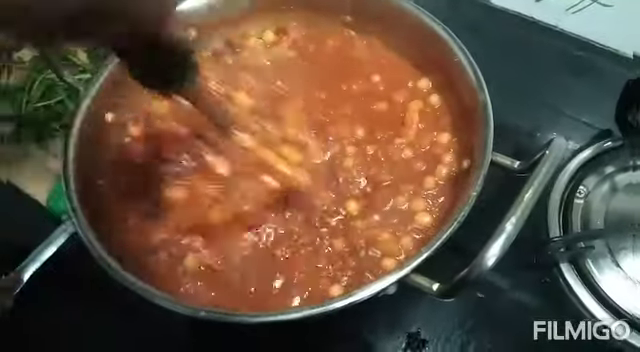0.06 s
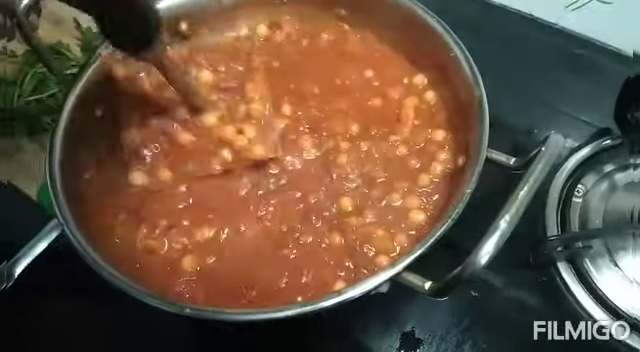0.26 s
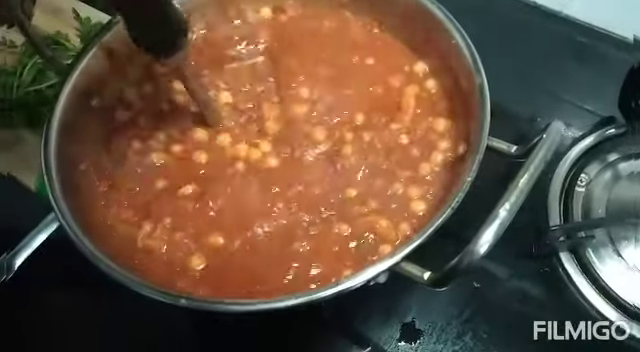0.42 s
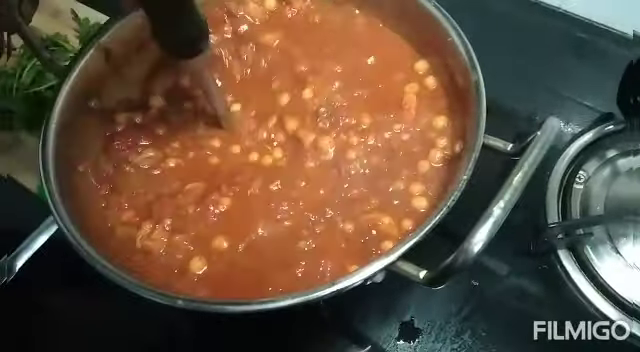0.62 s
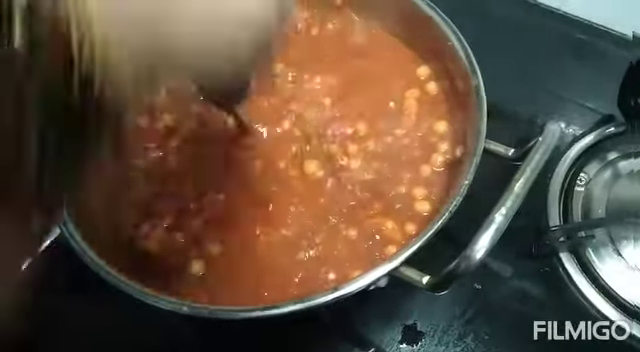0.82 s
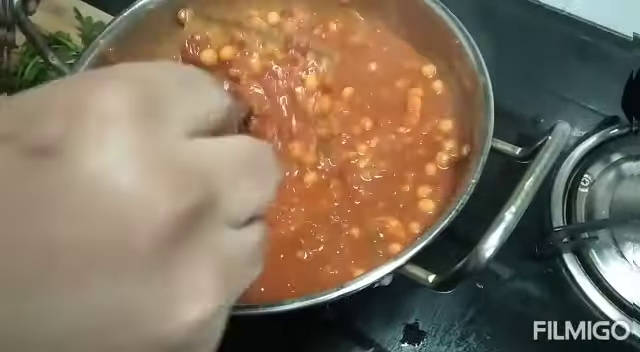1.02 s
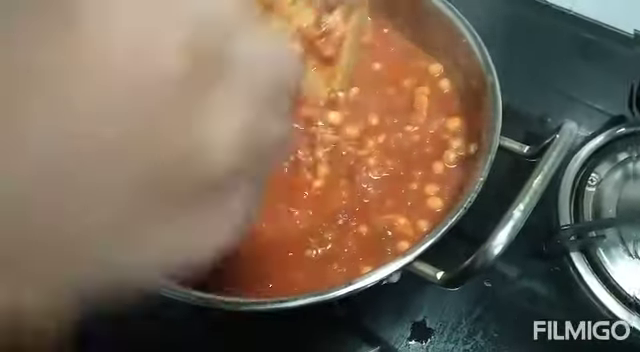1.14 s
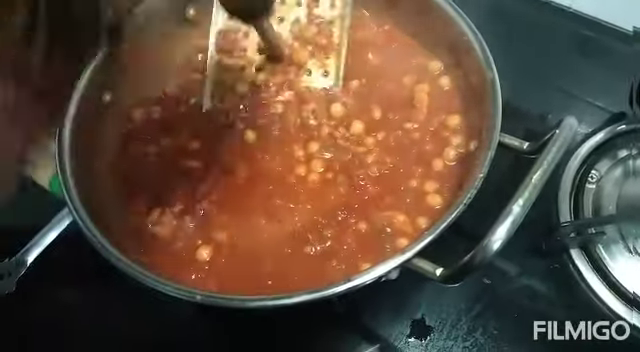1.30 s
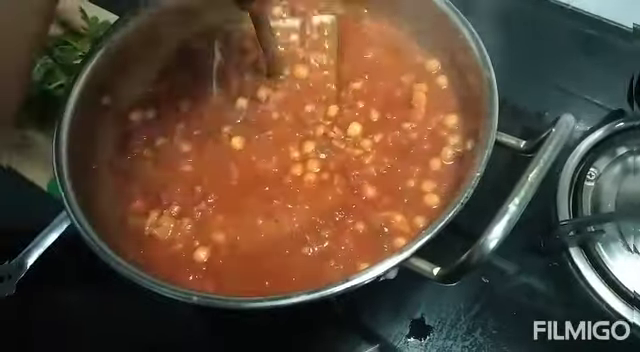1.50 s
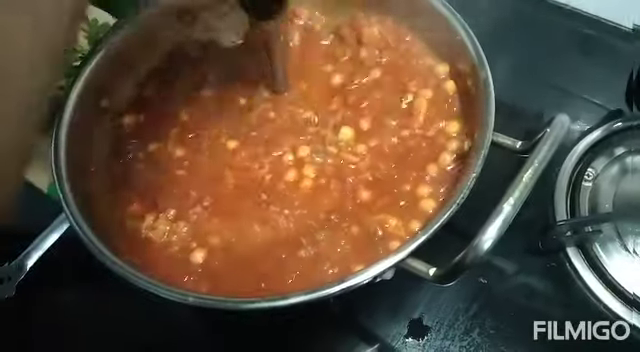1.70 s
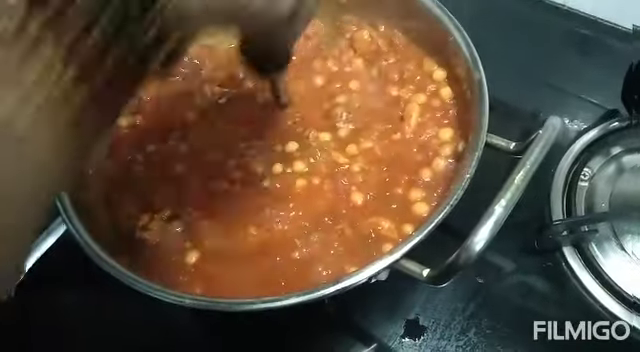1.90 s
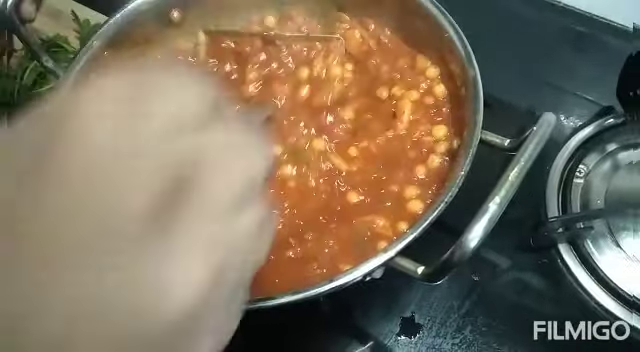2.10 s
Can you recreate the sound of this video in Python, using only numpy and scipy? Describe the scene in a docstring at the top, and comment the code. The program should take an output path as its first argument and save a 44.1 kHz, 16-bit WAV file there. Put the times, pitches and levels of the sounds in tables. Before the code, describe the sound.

A steel masher lands hard on the bottom of a steel pan of thick curry, settles with dull bumps and lifts with a soft knock, then repeats; close microphone, echoing bare kitchen, low simmer and faint hum.

```python
"""A steel masher is pushed through thick curry and knocks on the bottom of a steel pan in a bare, echoing kitchen.
Each stroke lands hard, settles with dull bumps and lifts with a soft knock: short noise bursts
over decaying sines for pan and masher. Small ticks, pops and hisses are narrow noise and tiny rings.
A faint whine, a low hum and the simmer form the floor; the echo is decaying noise, convolved with the sounds."""
import sys
import numpy as np
from scipy import signal
from scipy.io import wavfile

SR = 44100
rng = np.random.default_rng(int(sys.argv[2]) if len(sys.argv) > 2 else 0)


def gain_from_decibels(decibels):
    """Convert decibel values to linear amplitude factors."""
    exponent = np.asarray(decibels, float) / 20
    return 10 ** exponent


def digitize_waveform(pressure):
    """Quantize a signal to 16-bit integers and store it at the path in sys.argv[1].

    Rows of a 2-D input are taken as channels; values are limited to [-1, 1].
    """
    field = np.atleast_2d(pressure).T
    bounded = np.clip(field, -1, 1)
    quanta = np.round(bounded * 32767).astype(np.int16)
    wavfile.write(sys.argv[1], SR, quanta)


N = 94815
EDGES = 28 * 2 ** np.arange(0, 9.2, 1 / 3)    # third-octave band edges, Hz


def rms_one(x):
    """Scale to rms 1."""
    return x / np.sqrt(np.mean(x ** 2) + 1e-20)


def at_hz(points, hz):
    """Read a table of (Hz, value) on a log-frequency axis."""
    table_hz, values = np.transpose(points)
    return np.interp(np.log(hz), np.log(table_hz), values)


def drift(rate_hz):
    """Slow random wander of spread 1: low-passed noise, made at SR / 40 and interpolated."""
    r = np.exp(-2 * np.pi * rate_hz * 40 / SR)
    white = rng.standard_normal(N // 40 + 2002)
    slow = rms_one(signal.lfilter([1], [1, -2 * r, r * r], white)[2000:])    # skip the filter's start
    return np.interp(np.arange(N) / 40, np.arange(len(slow)), slow)


def band(x, low_hz, high_hz):
    """Butterworth band-pass."""
    sos = signal.butter(2, [low_hz, min(high_hz, 0.45 * SR)], "band", fs=SR, output="sos")
    return signal.sosfilt(sos, x)


def colour(x, spectrum):
    """Causal colouring by a bank of third-octave bands."""
    return sum(gain_from_decibels(at_hz(spectrum, np.sqrt(low * high))) * band(x, low, high)
               for low, high in zip(EDGES, EDGES[1:]))


def ring(clicks, hz, t60):
    """Resonant mode: a unit click sets a sine of height 1 ringing, down 60 dB after t60 seconds."""
    r = gain_from_decibels(-60 / (t60 * SR))
    w = 2 * np.pi * hz / SR
    return signal.lfilter([0, np.sin(w)], [1, -2 * r * np.cos(w), r * r], clicks + 1e-18)


def burst(length_s):
    """Short grinding contact: noise that rises and dies within a few lengths, with its outline's energy."""
    t = np.arange(4000) / (max(length_s, 0.0005) * SR / 2)
    outline = t * np.exp(1 - t)
    return rms_one(rng.standard_normal(4000) * outline) * np.sqrt(np.mean(outline ** 2))


def add(out, s, sound):
    """Mix a sound in at s seconds."""
    i = int(s * SR)
    out[i:i + len(sound)] += sound[:N - i]


def floor():
    """Simmer and room noise in patchy bands, hum as narrow noise, whine as a wavering sine."""
    # Noise spectrum. Each row: frequency in Hz, relative density in dB per Hz
    floor_spectrum = [(25, -44), (60, -17), (119, -10), (337, -0.5), (550, -8.5), (850, -1), (1300, -9),
                      (1690, -22), (2030, -8.5), (2600, -9.5), (4200, -12.5), (5800, -18), (8500, -14.5),
                      (11000, -17), (14000, -26)]
    # Simmer and stirring over time. Each row: time in seconds, level in dB
    stir_levels = [(0, -56.5), (.19, -58.5), (.9, -56), (1.1, -61), (1.35, -59), (1.7, -53.5), (1.95, -60),
                   (2.15, -54.5)]
    # Low hums. Each row: centre in Hz, width in Hz, level in dB
    hum_bands = [(99, 34, -73), (126.8, 4.5, -68)]
    t = np.arange(N) / SR
    white = rng.standard_normal((2, N))
    noise = np.zeros(N)
    for k, (low, high) in enumerate(zip(EDGES, EDGES[1:])):
        patchy_db = at_hz(floor_spectrum, np.sqrt(low * high)) + 0.5 * drift(14.0)
        noise += gain_from_decibels(patchy_db) * band(white[k % 2], low, high)    # neighbours use separate noise
    out = gain_from_decibels(np.interp(t, *np.transpose(stir_levels))) * rms_one(noise)

    for hz, width_hz, db in hum_bands:
        hum = band(rng.standard_normal(N), hz - width_hz / 2, hz + width_hz / 2)
        out += gain_from_decibels(db) * rms_one(hum)

    whine_hz = 718 + 1.49 * drift(3.22)
    whine_db = -65 + 0.27 * drift(1.7)
    phase = 2 * np.pi * np.cumsum(whine_hz) / SR
    return out + np.sqrt(2) * gain_from_decibels(whine_db) * np.sin(phase)


def kitchen(x):
    """Echo of bare walls: noise that builds up and dies band by band, with a stronger early part."""
    # Decay time of the room. Each row: frequency in Hz, t60 in seconds
    room_decay = [(100, 0.9), (300, 0.82), (800, 1.145), (2000, 0.95), (5000, 0.74), (9000, 0.81),
                  (12000, 0.75), (14000, 0.5)]
    build_s, early_db, early_t60_s = 0.007, 11, 0.1
    t = np.arange(N // 2) / SR
    white = rng.standard_normal((2, N // 2))
    echo = np.zeros(N // 2)
    for k, (low, high) in enumerate(zip(EDGES, EDGES[1:])):
        t60 = at_hz(room_decay, np.sqrt(low * high))
        echo += band(white[k % 2], low, high) * gain_from_decibels(-60 * t / t60)
    echo *= 1 - np.exp(-t / build_s)
    echo *= 1 + gain_from_decibels(early_db - 60 * t / early_t60_s)
    echo *= gain_from_decibels(1 * drift(41.0)[:N // 2] * np.exp(-t / 0.58))    # lumps of 1 dB that even out
    return signal.fftconvolve(x, echo / np.sqrt(np.sum(echo ** 2)))[:N]


def bubbles():
    """Small pops in the sauce: decaying sines at random times, sizes and pitches."""
    per_s, level_db, cycles = 50, -67, 6.0    # cycles: t60 in periods
    size_db = 2.9 * np.minimum(rng.exponential(1, N), 4)
    sizes = gain_from_decibels(size_db) * (rng.random(N) < per_s / SR)
    dealt = rng.integers(0, 12, N)    # which of twelve pitches each pop gets
    pops = sum(ring(sizes * (dealt == k), hz, cycles / hz)
               for k, hz in enumerate(np.geomspace(700, 7000, num=12)))
    return gain_from_decibels(level_db) * pops


def hisses():
    """Sauce squeezed and dragged: grainy bands of noise that swell and fade."""
    # Each row: start in seconds, length in seconds, level in dB, centre in Hz, half-width as share of centre
    hiss_events = [(0.22, 0.47, -51, 8500, 0.33), (1.04, 0.43, -66.5, 1670, 0.061),
                   (1.384, .2, -46, 9300, .3), (2.026, 0.23, -62.5, 4100, 0.14)]
    out, t = np.zeros(N), np.arange(N) / SR
    for s, length_s, db, hz, share in hiss_events:
        noise = rms_one(band(rng.standard_normal(N), hz / (1 + share), hz * (1 + share)))
        grainy = noise * gain_from_decibels(1.3 * drift(40.0))
        progress = np.clip((t - s) / length_s, 0, 1)
        out += gain_from_decibels(db) * grainy * np.sin(np.pi * progress ** 0.73)
    return out


def ticks():
    """Small ticks, a dry bump and the bright clicks of soft knocks: short bursts of band-passed noise."""
    # Each row: start in seconds, level in dB, centre in Hz, length in seconds
    tick_events = [(0.093, -56, 8200, 0.0033), (0.102, -53.5, 3600, .009), (0.539, -50.5, 4270, 0.019),
                   (0.983, -59.5, 5060, 0.021), (0.299, -28, 2000, 0.0047), (.537, -40, 840, 0.0059),
                   (.538, -45.5, 320, 0.01), (1.317, -50.5, 1570, 0.0048), (1.604, -46, 1360, 0.0035),
                   (1.797, -58, 4040, 0.0023), (0.346, -33, 9200, 0.0062), (0.6594, -45.5, 3980, 0.0066),
                   (.66, -41, 8550, 0.0036), (0.718, -48.5, 3840, 0.0038), (0.769, -51, 4060, 0.0048),
                   (0.938, -41, 10900, .002), (0.993, -46, 10500, 0.021), (1.344, -56.5, 9200, 0.0057),
                   (1.72, -51.5, 4500, 0.0054), (1.754, -54, 3300, 0.004), (1.8194, -46, 4200, .003),
                   (1.82, -49, 8100, .004), (2.014, -47.5, 9350, 0.0013), (2.073, -54, 3870, 0.0026),
                   (2.117, -44, 11000, 0.0054)]
    spread = 0.26    # band half-width as share of centre
    out = np.zeros(N)
    for s, db, hz, length_s in tick_events:
        sound = band(burst(length_s), hz / (1 + spread), hz * (1 + spread))
        add(out, s, gain_from_decibels(db) * sound / np.sqrt(4 * spread * hz / SR))    # make up for the narrow band
    return out


def strike(clicks, s, db, modes):
    """Put a click at s into every mode's train, with 1 dB of random scatter."""
    mode_db = np.array(modes)[:, 0]
    scatter_db = 1 * rng.standard_normal(len(modes))
    out = clicks.copy()
    out[:, int(s * SR)] = gain_from_decibels(db + mode_db + scatter_db)
    return out


def knocks():
    """Each contact cracks, sends a clean pulse to the walls and strikes the pan; hard ones also ring the masher."""
    # Masher lands on the pan. Each row: start in seconds, crack level in dB before colouring,
    # contact length in seconds, brightest frequency in Hz, pan ring in dB, masher ring in dB
    blow_events = [(0.2002, -12.5, 0.00606, 3780, -36, -31.5), (1.3772, -15, 0.00254, 3030, -37, -42.5)]
    # Cushioned bumps, and at .692 a faint swell of the beating pan ring. Each row: start in seconds,
    # thud level in dB before colouring, contact cut-off in Hz, contact length in seconds,
    # pan ring in dB before the cut-off
    bump_events = [(.234, -25.5, 1050, 0.0029, -35.5), (0.6587, -32, 1080, 0.0041, -36.5),
                   (.692, -38.5, 990, .004, -52), (1.41, -28.5, 980, 0.003, -36.5),
                   (1.8195, -34.5, 1025, 0.0064, -38)]
    # Colour of the contacts. Each row: frequency in Hz, level in dB per Hz
    crack_spectrum = [(60, -23), (110, -1.5), (200, -1.5), (425, 5), (540, 3.5), (800, 9), (1400, 8),
                      (1750, 6.5), (2230, 10), (3200, 5.5), (4180, 6), (5500, 2.5), (6800, 1.5),
                      (8880, 5.5), (10500, 2.5), (12000, 7), (13500, -7), (15000, -22)]
    # Pitches of the pan's modes in Hz
    pan_pitches = [283, 430, 630, 774, 825, 872, 965, 993, 1092, 1275, 1465, 1950, 2697, 3117]
    # Pan modes, in the same order. Each row: level in dB relative to the strike, t60 in seconds
    pan_modes = [(-13.5, 0.3), (-1.5, 0.078), (-18.5, 0.13), (-6, 0.1), (-3, 0.2), (-4, 0.56),
                 (-11.5, 0.43), (-9.5, 0.25), (-14, 1), (-4.5, 0.05), (-2, 0.36), (0.5, 0.05), (-11, 0.27),
                 (-5, 0.17)]
    # Pitches of the masher's modes in Hz
    masher_pitches = [2125, 2163, 2197, 2226, 2240, 2292, 4000, 4075]
    # Masher modes, in the same order. Each row: level in dB relative to the strike, t60 in seconds
    masher_modes = [(-8, .3), (-5, .45), (0, .85), (-4, .55), (-6, .4), (-8, .3), (-4, .1), (-5, .09)]
    peak_db, peak_width = -0.5, 0.31    # resonance of a hard blow; width as share of its frequency

    crack, pulse = np.zeros(N), np.zeros(N)
    click = signal.unit_impulse(4000)
    pan, masher = np.zeros((len(pan_modes), N)), np.zeros((len(masher_modes), N))

    for s, db, length_s, hz, pan_db, masher_db in blow_events:
        b, a = signal.iirpeak(hz, 1 / peak_width, fs=SR)
        for out, sound in ((crack, burst(length_s)), (pulse, np.sqrt(length_s * SR) * click)):
            peak = gain_from_decibels(peak_db) * signal.lfilter(b, a, sound)
            add(out, s, gain_from_decibels(db) * (sound + peak))
        middle_s = s + length_s / 2
        pan = strike(pan, middle_s, pan_db, pan_modes)
        masher = strike(masher, middle_s, masher_db, masher_modes)

    for s, db, cut_hz, length_s, pan_db in bump_events:
        soft = signal.butter(2, cut_hz, fs=SR, output="sos")
        gain = gain_from_decibels(db) * np.sqrt(SR / 2 / cut_hz)    # make up for the lost treble
        add(crack, s, gain * signal.sosfilt(soft, burst(length_s)))
        add(pulse, s, gain * np.sqrt(length_s * SR) * signal.sosfilt(soft, click))
        # a soft contact hardly excites modes far above its cut-off
        loss_db = 10 * np.log10(1 + (np.array(pan_pitches) / cut_hz) ** 6)
        pan = strike(pan, s, pan_db - loss_db, pan_modes)

    rings = np.zeros(N)
    for pitches, modes, clicks in ((pan_pitches, pan_modes, pan), (masher_pitches, masher_modes, masher)):
        for hz, (_, t60), train in zip(pitches, modes, clicks):
            rings += ring(train, hz, t60)
    return colour(crack + 1e-18, crack_spectrum), colour(pulse + 1e-18, crack_spectrum), rings


def scene():
    """Knocks and small sounds in the kitchen over the floor; the direct sound has little bass."""
    crack, pulse, rings = knocks()
    small = ticks() + bubbles()
    to_room = gain_from_decibels(-1) * (pulse + 0.15 * rings) + gain_from_decibels(-13.5) * small
    echo = kitchen(to_room)
    bass_cut = signal.butter(3, 190, "high", fs=SR, output="sos")
    direct = signal.sosfilt(bass_cut, crack + rings + small)
    return (direct + echo + hisses() + floor())[None]


def roll_off(x):
    """The treble ends steeply here."""
    return signal.sosfilt(signal.butter(12, 15270, fs=SR, output="sos"), x)


def record(dry):
    """Dips in the microphone's response, then a steep top cut."""
    # Dips of the microphone port. Each row: centre in Hz, width in Hz, depth as share from 0 to 1
    port_dips = [(5027, 139, .9), (5323, 252, 0.5), (11310, 1650, 0.62)]
    for hz, width_hz, depth in port_dips:
        b, a = signal.iirnotch(hz, hz / width_hz, fs=SR)
        notched = signal.lfilter(b, a, signal.lfilter(b, a, dry))
        dry = (1 - depth) * dry + depth * notched
    top_cut = signal.cheby2(14, 60, 14400, fs=SR, output="sos")    # 60 dB down from 14400 Hz
    return roll_off(signal.sosfilt(top_cut, dry))


dry = scene()
out = record(dry)
digitize_waveform(out)
```